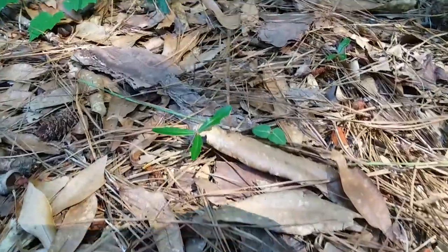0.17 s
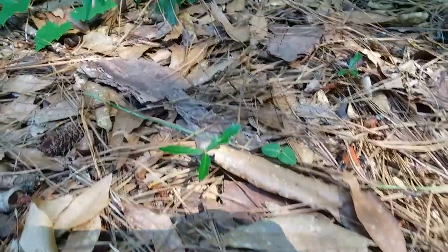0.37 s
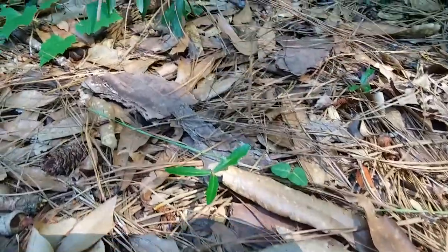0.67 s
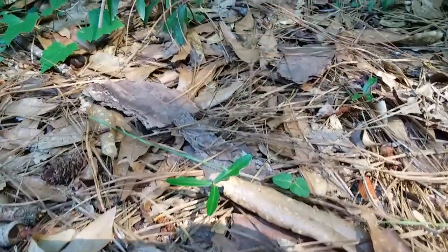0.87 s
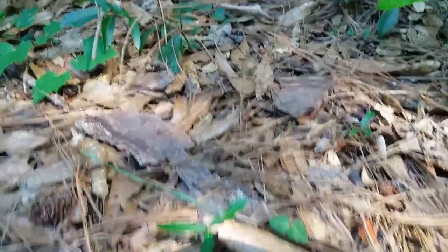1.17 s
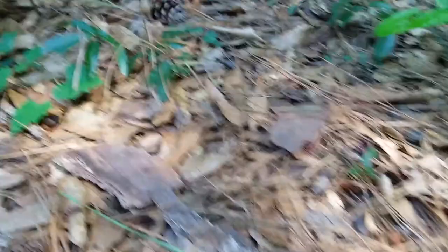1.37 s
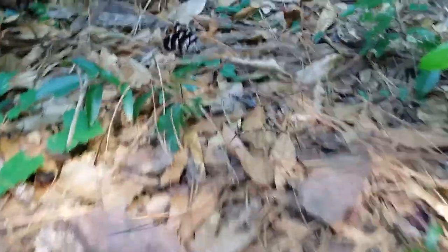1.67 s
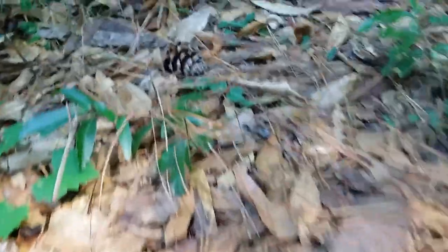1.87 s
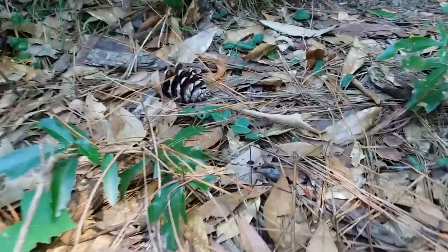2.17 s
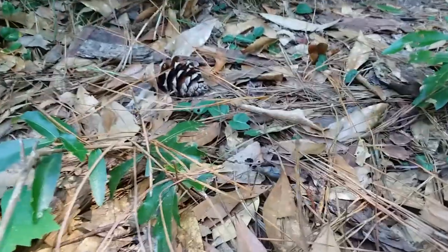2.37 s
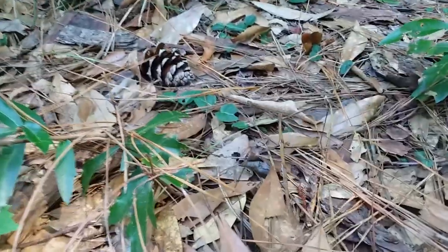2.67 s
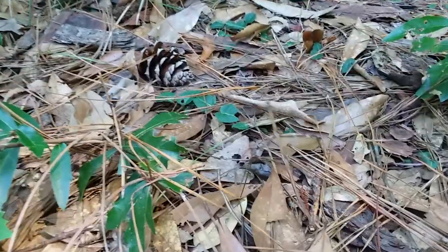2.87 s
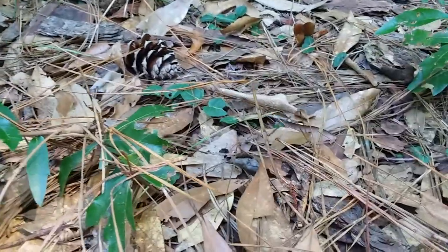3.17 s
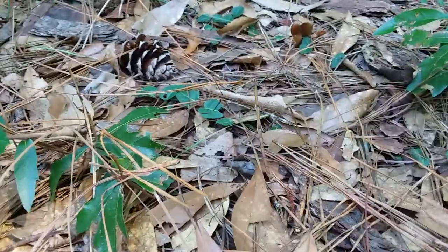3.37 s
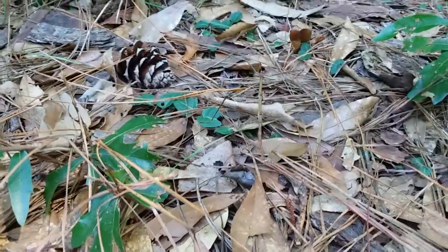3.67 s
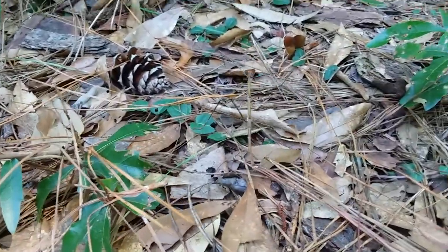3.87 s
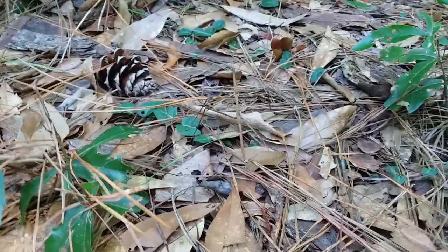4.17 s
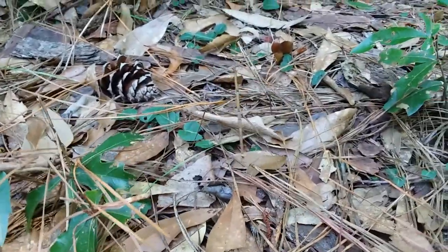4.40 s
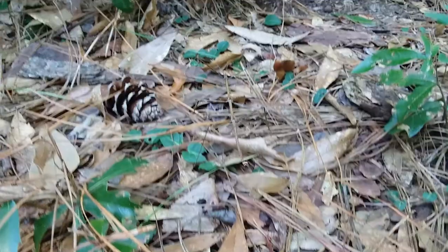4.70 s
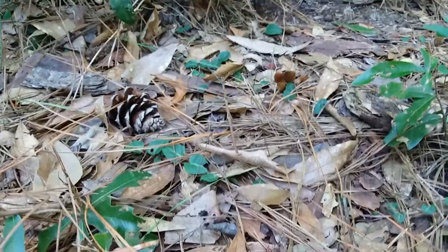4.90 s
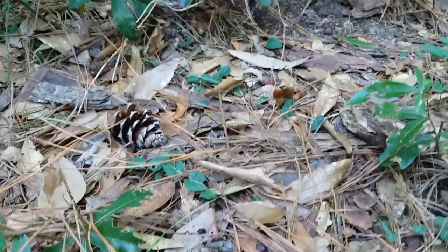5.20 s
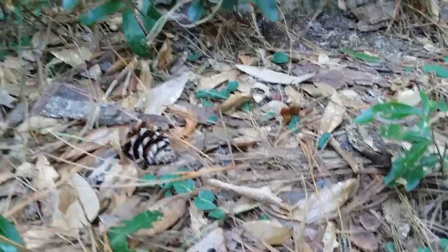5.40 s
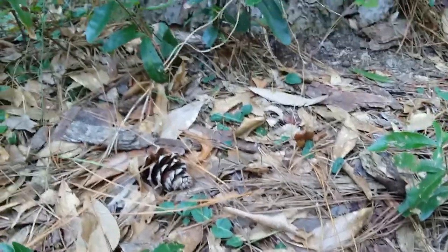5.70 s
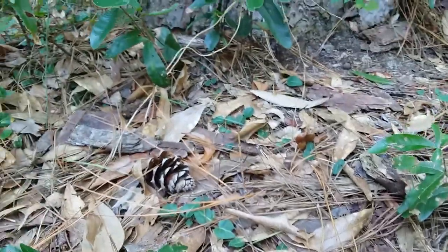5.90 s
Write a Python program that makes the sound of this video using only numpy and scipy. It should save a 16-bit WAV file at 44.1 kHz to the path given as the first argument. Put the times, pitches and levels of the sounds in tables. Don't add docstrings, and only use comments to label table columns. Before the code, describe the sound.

Outdoors in a wood, a cicada holds a continuous shrill, rasping buzz over soft distant traffic and insect hiss. A bird chips once, then a finger scrapes and knocks the handheld microphone, loudest on the left. Dry needles and twigs snap close by as feet shift. The buzz swells mid-way, then dies away near the end, leaving quiet hum and a few light crackles.

```python
import sys
import numpy as np
from scipy import signal
from scipy.fft import rfft, irfft, next_fast_len
from scipy.io import wavfile
from scipy.ndimage import uniform_filter1d

SR = 44100
rng = np.random.default_rng(int(sys.argv[2]) if len(sys.argv) > 2 else 0)


def transcribe(u):
    v = np.clip(np.atleast_2d(u).T, -1, 1)
    q = np.round(v * 32767).astype(np.int16)
    wavfile.write(sys.argv[1], SR, q)


def gain_from_db(level_db):
    decades = np.asarray(level_db, float) / 20
    return 10 ** decades


N = 266628
T = np.arange(N) / SR


def evened(x):
    return x / np.sqrt(np.mean(x ** 2) + 1e-20)


def read(points, hz, off=None):
    f, value = np.transpose(points)
    return np.interp(np.log(hz + 1), np.log(f + 1), value, off, off)


def curve(rows, t):
    s, *columns = np.transpose(rows)
    return [np.interp(t, s, c) for c in columns]


def tents(rows, t):
    lines = [db - rise * np.maximum(s - t, 0) - fall * np.maximum(t - s, 0) for s, db, rise, fall in rows]
    return np.max(lines, 0)


def add(mix, s, sound):
    part = mix[..., round(s * SR):][..., :sound.shape[-1]]
    part += sound[..., :part.shape[-1]]


def band(x, lo_hz, hi_hz):
    sos = signal.butter(2, [lo_hz, min(hi_hz, SR / 2.1)], "bandpass", fs=SR, output="sos")
    return signal.sosfilt(sos, x)


def later(x, ms):
    size = next_fast_len(len(x) + 512)
    delay = np.exp(-2j * np.pi * np.fft.rfftfreq(size, 1 / SR) * ms / 1000)
    return irfft(rfft(x, size) * delay, size)[:len(x)]


def ring(hz, db, t60, size=1600):
    t = np.arange(size) / SR
    return gain_from_db(db - 60 * t / max(t60, .001)) * np.sin(2 * np.pi * hz * t)


def trees(x, t60, turns_hz):
    size, out = 9000, np.zeros((2, N))
    for k in range(6):
        taps = np.zeros(size)
        at = np.arange(40, size - 22, 22)
        taps[at + rng.integers(0, 22, len(at))] = rng.choice([-1., 1.], len(at))
        taps *= gain_from_db(-60 * np.arange(size) / SR / t60)
        turn = np.cos(np.pi * (turns_hz * T + k / 3)) * np.sqrt(2 / 3)
        out[k // 3] += signal.oaconvolve(x * turn, taps / np.linalg.norm(taps))[:N]
    return out


def swells(t):
    # peak_s, length_s, level_db
    gusts = [
        (1.423, 0.31, 7),
        (2.363, 0.55, 3.5),
        (4.275, 0.2, -2.5),
    ]
    closest_s, miss_s, floor_db = 5.96, 1, -11
    tyres = 20 * np.log10(gain_from_db(floor_db) + miss_s ** 2 / (miss_s ** 2 + (t - closest_s) ** 2))
    gust = sum(db * np.exp(-((t - s) / length) ** 2) for s, length, db in gusts)
    calming_db_per_s = -0.9
    parts = (0.059 * gust, tyres + 0.45 * gust, calming_db_per_s * t + 0.2 * gust, gust)
    return [v - np.median(v) for v in parts]


def wash(colour, level_db, size, patchy_db):
    # pitch_hz, likeness (1 same, 0 unrelated)
    likeness = [(60, 1), (180, 0.85), (550, 0.61), (1650, 0.027), (4970, -0.16), (15000, -0.12)]
    hop = size // 4
    frames, hz = N // hop + 5, np.fft.rfftfreq(size, 1 / SR)
    a, b, c, d, patches = rng.standard_normal((frames, len(hz), 5)).T
    patches = uniform_filter1d(uniform_filter1d(patches, 10, 0), 3600 // hop, 1)
    level = read(colour, hz, -100)[:, None] + patchy_db * evened(patches)

    where = np.log(hz + 1)[:, None]
    places = ((90, 4.9), (850, 0.36), (2100, 0.86), (13000, 0.32))
    for (f, width), swell_db in zip(places, swells(np.arange(frames) * hop / SR)):
        level = level + np.exp(-((where - np.log(f)) / width) ** 2) * swell_db

    same = np.clip(read(likeness, hz), -1, 1)[:, None]
    left = a + 1j * b
    right = same * left + np.sqrt(1 - same ** 2) * (c + 1j * d)
    z = np.array([left, right]) * gain_from_db(level)
    return gain_from_db(level_db) * evened(signal.istft(z, nperseg=size, noverlap=size - hop)[1][:, :N])


def air():
    # pitch_hz, level_db (per Hz)
    road_colour = [(21, -24), (35, -36), (59, -2), (86, -7.5), (102, 1), (117, 0), (144, -7.5), (194, -9.5),
                   (220, -9), (246, -12.5), (407, -15.5), (515, -18.5), (632, -22.5), (787, -21.5),
                   (1500, -29), (1950, -54), (3300, -120)]
    # pitch_hz, level_db (per Hz)
    hum_colour = [(760, -7), (1300, -39), (1620, -4.5), (1760, -6), (2020, -4.5), (3630, -2), (3910, -2.5),
                  (4430, -2.5), (4670, -3), (5820, 0.5), (6320, -0.5), (11100, -9.5), (15900, -15)]
    road = wash(road_colour, -57.5, size=4096, patchy_db=1.97) * gain_from_db([[.6], [-.6]])
    return road + wash(hum_colour, -64.5, size=1024, patchy_db=1.75)


def cricket():
    pitch_hz, level_db = 5630, -80
    slow, fast = [evened(uniform_filter1d(rng.standard_normal(N), size)) for size in (900, 60)]
    turns = 2 * np.pi * np.cumsum(pitch_hz + 14 * slow) / SR
    hush_db = -14 * np.exp(-((T - 2.3) / 1.4) ** 2)
    swell_db = 24 * np.maximum(T - 5.9, 0)
    tone = np.sin(turns) + gain_from_db(-6) * fast * np.sin(2 * turns)
    return trees(tone * gain_from_db(level_db + hush_db + swell_db), 0.22, 0.87) * gain_from_db([[2.5], [-2.5]])


def bird():
    # time_s, pitch_hz, level_db
    path = [
        (.942, 8200, -61),
        (.947, 7950, -55),
        (.958, 7540, -67),
        (.968, 7480, -48),
        (.974, 7400, -82),
    ]
    hz, db = curve(path, T)
    chip = gain_from_db(db) * np.sin(2 * np.pi * np.cumsum(hz) / SR) * (T > path[0][0]) * (T < path[-1][0])
    return chip + gain_from_db(2) * trees(chip, 0.45, 0.41)


def rustle():
    # peak_s, level_db, rise_db_per_s, fall_db_per_s
    treads = [
        (1.5, -59.5, 86, 18),
        (5.35, -69, 240, 118),
        (5.7, -74, 80, 7),
    ]
    size = gain_from_db(3.5 * np.minimum(rng.exponential(1, (2, N)), 4))
    size *= rng.random((2, N)) < 1500 / SR
    size = (size + .5 * size[::-1]) * rng.choice([-1., 1.], N)
    cracks = band(size, 760, 3400) + gain_from_db(-10) * band(band(size, 8200, 23000), 7600, 15000)
    settle_db = 70 * np.clip(T - 1.774, 0, .4) * (T < 3)
    return evened(cracks) * gain_from_db(tents(treads, T) - settle_db)


def snap(fizz_db, body_db, hz, pan_db, middle_db):
    # multiple of its pitch, level_db, t60_s
    overtones = [(.62, 0, .006), (.97, 0.5, .011), (1.13, 7.5, .005), (1.3, 2.5, .005)]
    t = np.arange(900) / SR
    burst = rng.standard_normal((2, len(t))) * (np.exp(-t / 0.00066) + 0.14 * np.exp(-t / 0.0066))
    burst = 0.52 * burst[:1] + .5 * burst
    fizz = gain_from_db(fizz_db + 2.5) * band(band(burst, 10000, 17700), 7300, 14500)
    middle = gain_from_db(middle_db + 10.5) * band(burst, 3250, 10300)
    body = 0
    for n, (multiple, db, t60) in enumerate(overtones):
        body = body + (-1) ** n * ring(hz * multiple, body_db + 7.5 + db, t60, size=900)
    body = band(band(body, .5 * hz, 2.2 * hz), .5 * hz, 5800)
    return (fizz + middle + body) * gain_from_db([[pan_db / 2], [-pan_db / 2]])


def needles_and_twigs():
    # time_s, fizz_db, left_over_right_db
    needles = [(.0806, -49, -2), (1.4283, -36.5, -6), (1.7508, -39.5, -12), (1.8156, -45, 2),
               (2.14, -42, -8), (2.6622, -44, -2), (4.6603, -47, -5), (5.3361, -34, -11), (5.3661, -43, -2),
               (5.594, -50, 3), (5.6505, -51, 0), (5.6794, -45, -13), (5.7088, -51, -3), (5.798, -48, -6),
               (5.901, -58, 11)]
    # time_s, fizz_db, body_db, body_hz, left_over_right_db
    twigs = [(1.4543, -42.5, -62, 1600, -17), (1.49, -36, -43.5, 2170, -7), (1.5087, -54, -62, 1750, -4.5),
             (1.5237, -38, -55, 1480, -13), (1.5754, -41, -54, 3550, 0), (1.5926, -28.5, -52.5, 1340, -4),
             (1.6592, -42, -57, 3270, -6), (1.6853, -26.5, -29, 2400, -6), (2.334, -47, -63, 3700, 0),
             (3.1223, -41, -68.5, 3700, -4), (4.1188, -60, -56, 1073, 9), (3.865, -70, -42.5, 520, -14)]
    near = np.zeros((2, N))
    for s, db, pan_db in needles:
        add(near, s + 0.0021, snap(db, db - 27, 1120, pan_db, db - 13))
    for s, db, body_db, hz, pan_db in twigs:
        middle_db = db - 10.5 - 0.59 * max(body_db - db - 6, 0)
        add(near, s + 0.001, snap(db, body_db, hz, pan_db, middle_db))
    return near + gain_from_db(-18) * trees(near.mean(0), .04, 3.)


def rub():
    # peak_s, level_db, rise_db_per_s, fall_db_per_s
    pulls = [
        (1.187, -38, 4000, 1500),
        (1.26, -40, 700, 2450),
    ]
    start_s, end_s, drag_db, edge_db_per_s = 1.186, 1.262, -55, 2500
    rough_db = 2.9 * rng.standard_normal(N // 60 + 1).clip(-3, 1.5)
    drag = band(rng.standard_normal(N) * gain_from_db(rough_db).repeat(60)[:N], 290, 3100)
    outside_s = np.maximum(np.maximum(start_s - T, T - end_s), 0)
    hold_db = drag_db - edge_db_per_s * outside_s
    return evened(drag) * gain_from_db(np.maximum(hold_db, tents(pulls, T))) * gain_from_db([[0], [-16]])


def case_slip(blow_db, tick_db, bright, far_db):
    # pitch_hz, level_db, t60_s
    case_notes = [(290, -9, .018), (470, -1, .013), (850, -5, .005), (1750, -3, .006)]
    t = np.arange(1600) / SR
    jerk = -np.exp(-((t - .00035) / .00016) ** 2)
    near = sum(ring(hz, db + 12 * (bright - .5) * np.log2(hz / 700), t60) for hz, db, t60 in case_notes)
    near = later(near / abs(near).max(), .55)
    tick = band(rng.standard_normal(len(t)), 2500, 21000 * bright)
    tick = tick * np.exp(-abs(t - .0003) / .0003) * gain_from_db(tick_db)
    left = gain_from_db(blow_db) * (band(1.1 * jerk + near, 900 * bright ** 3, 9000) + tick)
    low = band(later(ring(520, far_db + 4, .011) + ring(300, far_db - 9, .03), 1.5), 150, 1100)
    return np.array([left, low + gain_from_db(blow_db - 5) * band(tick, 2500, 6000)])


def finger_slips():
    # time_s, blow_db, tick_db (over the blow), brightness (0-1), far_port_ring_db
    slips = [(1.1872, -8, -13, .45, -25), (1.2295, -42, -8, .9, -60), (1.2345, -40, -10, .8, -44),
             (1.2475, -15.5, -16, .85, -25.5), (1.2531, -27, -3, .8, -48), (1.2562, -27, -10, .7, -50),
             (1.2575, -21, -14, .9, -50), (1.2592, -14, -1, .7, -34), (1.2618, -23, -8, .5, -44),
             (1.2646, -27, -8, .8, -50), (1.2664, -20, -7, .55, -37), (1.2682, -25, -9, .4, -35)]
    out = np.zeros((2, N))
    for s, *row in slips:
        add(out, s, case_slip(*row))
    return out


def drum_clicks(sway_ms=0.029, lead=-1.68, bend=0.51, weak_db=-1.0):
    # time_s, lateness_ms, throb_depth_db
    drums = [(0, 0.087, 2), (1, 0.093, 4.5), (2, 0.15, 3.5), (3.5, 0.15, 4.5), (4.1, 0.16, 5.5),
             (4.7, 0.17, 3.5), (5.3, 0.18, 2)]
    strokes_hz = 248.68 + .68 * T - .012 * T ** 2
    pumping_hz = 98.6 - .27 * T ** 2.82
    turns = 2 * np.cumsum(strokes_hz) / SR
    n = np.arange(1, int(turns[-1]))
    s = np.interp(n, turns, T)
    pump = 2 * np.pi * np.interp(s, T, np.cumsum(pumping_hz) / SR)
    chance = rng.standard_normal((len(n), 2))
    late_ms, throb_db = curve(drums, s)
    sway = np.sin(pump) + bend * np.cos(2 * pump)
    s = s + (n % 2 * late_ms + sway_ms * sway + .004 * chance[:, 0]) / 1000
    throb = np.sin(pump + lead) + .3 * np.cos(2 * (pump + lead) - .6)
    size = gain_from_db(throb_db * throb + weak_db * (n % 2) + .7 * chance[:, 1])

    at = np.floor(s * SR).astype(int)[:, None] + np.arange(-15, 17)
    gap = at - s[:, None] * SR
    out = np.zeros(N + 64)
    np.add.at(out, at, size[:, None] * np.sinc(gap) * np.cos(np.pi * gap / 32) ** 2)
    return out[:N]


def cicada(sweep_ms=1.3):
    # time_s, effort_db
    effort = [(0, -62), (.65, -60.5), (.9, -62.5), (1.3, -61.5), (1.72, -58), (2.01, -54.5), (2.19, -56.5),
              (2.7, -55), (2.9, -56), (3.26, -53), (3.63, -54), (3.82, -58), (3.98, -55), (4.27, -57),
              (4.68, -58.5), (4.95, -67), (5.2, -62)]
    # time_s, turn (0 away, 1 side on, 2 facing, 3 past)
    turning = [(0, 0.61), (1.1, 0.82), (1.4, 2.4), (1.9, 0.86), (2.6, 1.66), (3.1, 2.18), (3.6, 2.27),
               (4, 2.4), (5.3, 2.3)]
    # pitch_hz, level_db
    colours = [
        [(3400, -37), (3730, 1), (4010, -18), (4260, 4), (4430, -28), (4730, -4), (4920, -34), (5520, -18), (5710, -10), (6010, -28), (6250, 24), (6520, -21), (7760, -4), (8700, -2), (9400, -30)],
        [(3400, -13), (3730, -4.5), (3980, -8), (4280, -15), (4480, -14), (4750, -4.5), (5570, -11.5), (6550, 0), (7070, 1.5), (7310, -7), (7570, -0.5), (8450, 0), (8750, -15), (9400, -20)],
        [(3400, -20), (3750, -9), (4010, -11), (4240, -14), (4500, -26), (4740, -11), (5640, -8.5), (6550, -5.5), (6770, -5), (7070, -8), (7310, -5), (8490, -2.5), (8750, -23.5), (9400, -16.5)],
        [(3400, -31), (3750, -13), (4120, -21), (4260, -7), (4540, -5.5), (5640, -17), (5840, -16), (6010, -6), (6300, -31), (6580, -7), (6800, -11), (7100, -1), (7380, -13), (8200, -13), (9400, -24)],
    ]
    # pitch_hz, level_db
    below = (2200, -55)
    above = (19400, -65)
    # pitch_hz, level_db
    edge_colour = [(5650, -42), (9600, -34), (11000, -9.5), (11500, -6), (12000, -22), (12600, -7),
                   (13600, -15), (14800, -14), (15900, -19)]
    # time_s, late_ms
    port_delay = [(0, .17), (1.5, .175), (2.3, .205), (3.3, .185), (4.5, .172)]

    hz, t, z = signal.stft(drum_clicks(), SR, nperseg=512, noverlap=384)
    effort_db = curve(effort, t)[0]
    swung = .5 + .5 * np.tanh((t - 1.7) / 0.12)
    pan_db = -6.5 * swung
    over_db = -22 + 9 * swung + 8 * np.clip((t - 4.8) / 0.22 + .5, 0, 1)

    turn = curve(turning, t)[0].clip(0, len(colours) - 1)
    body_db = 0
    for k, colour in enumerate(colours):
        share = np.maximum(1 - abs(turn - k), 0)
        body_db = body_db + read([below, *colour, above], hz, -90)[:, None] * share
    sweep = np.exp(1j * np.pi * sweep_ms / 1000 * (hz.clip(3000, 10000) - 10000) ** 2 / 5000)
    body = gain_from_db(body_db) * z * sweep[:, None]
    ragged = np.exp(.7j * rng.standard_normal(z.shape))
    top = gain_from_db(read(edge_colour, hz, -90))[:, None] * z * ragged
    level = [uniform_filter1d((abs(v) ** 2).sum(0), 40) ** .5 + 1e-9 for v in (body, top)]
    z = body / level[0] + gain_from_db(over_db) * top / level[1]

    fade = np.clip((5.15 - t) / 0.22, 0, 1)
    left = z * gain_from_db(effort_db + 2.5) * fade
    delay = np.exp(-2j * np.pi * hz[:, None] * curve(port_delay, t)[0] / 1000)
    right = z * delay * gain_from_db(effort_db - 0.5) * fade
    direct = np.array([signal.istft(v, SR, nperseg=512, noverlap=384)[1][:N] for v in (left, right)])
    song = direct[0]
    heard = gain_from_db(-1.5) * direct + gain_from_db(-11) * trees(song, .02, .3) + gain_from_db(-11.5) * trees(song, .45, .2)
    pan_db = np.interp(T, t, pan_db)
    return heard * gain_from_db([pan_db / 2, -pan_db / 2])


def scene():
    background = air() + cricket() + bird()
    ground = rustle() + needles_and_twigs()
    finger = rub() + finger_slips()
    return background + ground + finger + cicada()


def band_limit(x):
    return signal.sosfilt(signal.butter(12, 16990, fs=SR, output="sos"), x)


def record(dry):
    heard = signal.sosfilt(signal.butter(3, 45, "highpass", fs=SR, output="sos"), dry)
    heard = heard - .55 * band(heard, 9200, 10300)
    lowpass = signal.firwin(301, 16200, window=("kaiser", 8), fs=SR)
    heard = signal.oaconvolve(heard, lowpass[None], "same")
    return band_limit(heard)


dry = scene()
out = record(dry)
transcribe(out)
```